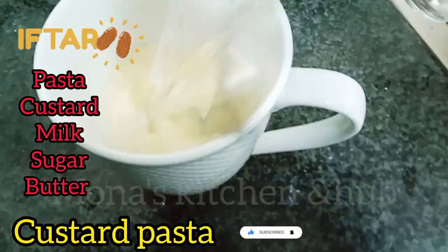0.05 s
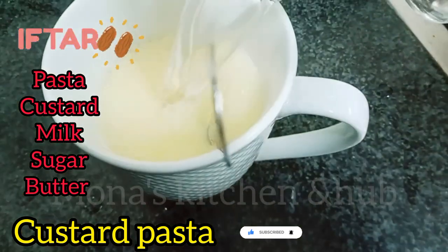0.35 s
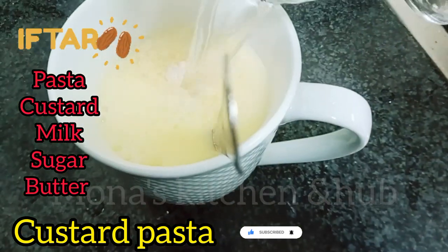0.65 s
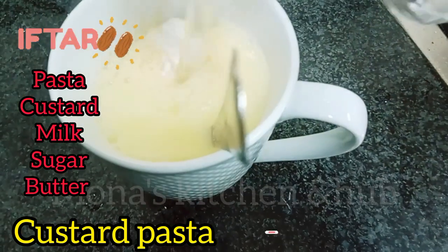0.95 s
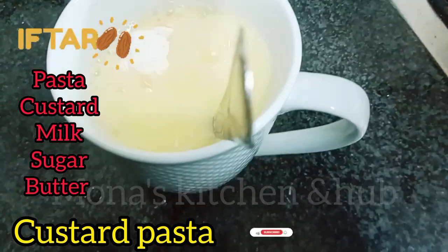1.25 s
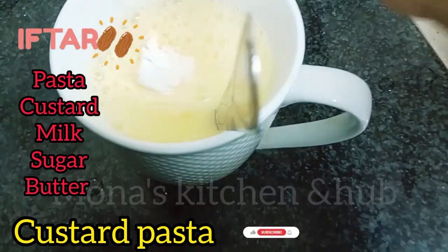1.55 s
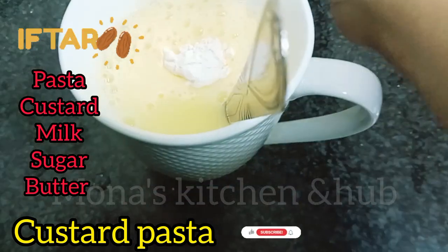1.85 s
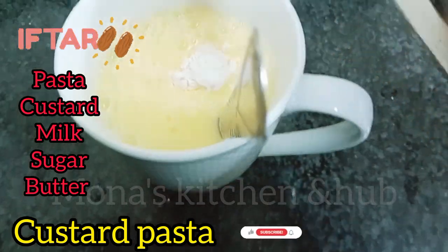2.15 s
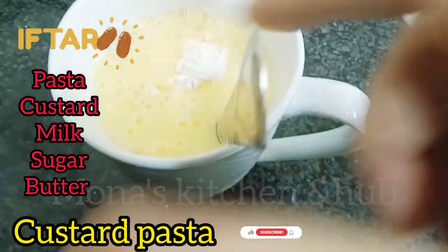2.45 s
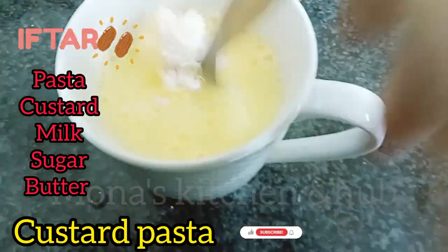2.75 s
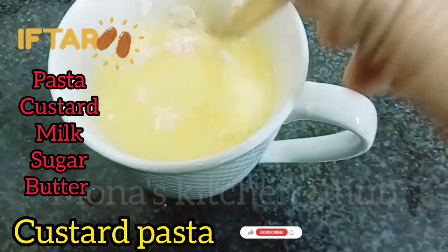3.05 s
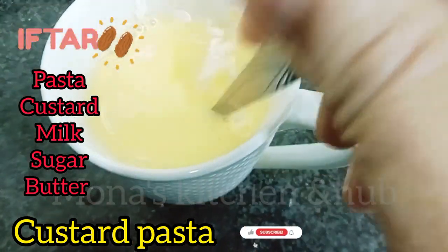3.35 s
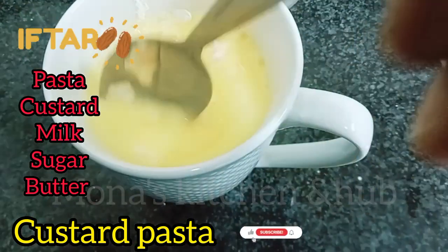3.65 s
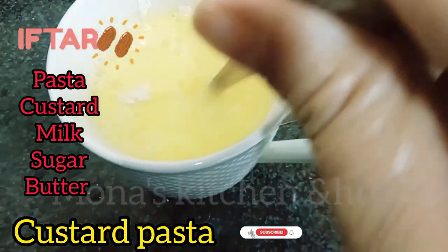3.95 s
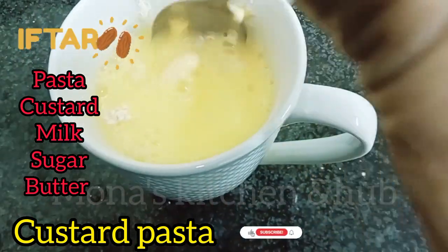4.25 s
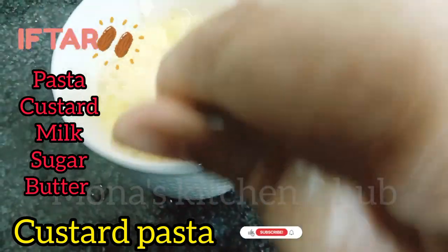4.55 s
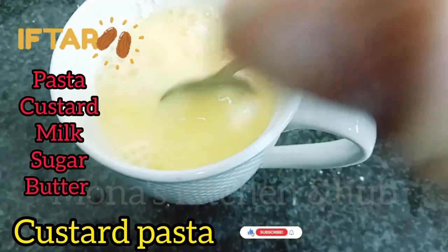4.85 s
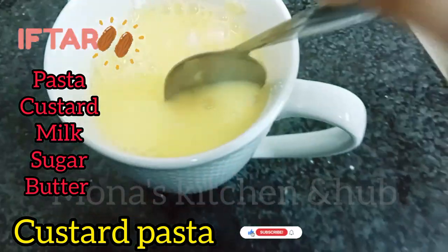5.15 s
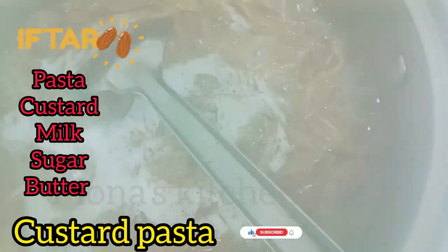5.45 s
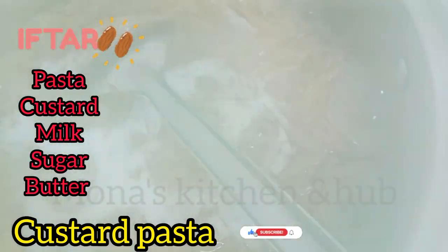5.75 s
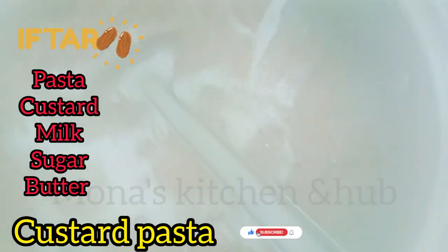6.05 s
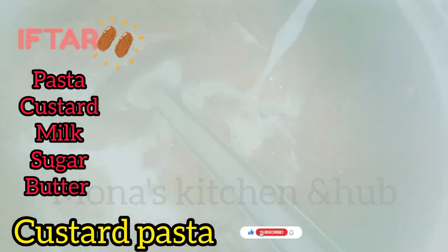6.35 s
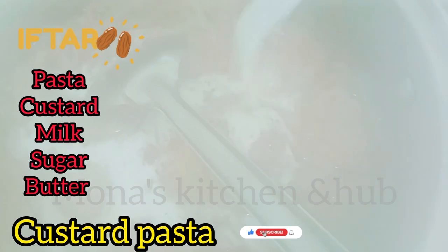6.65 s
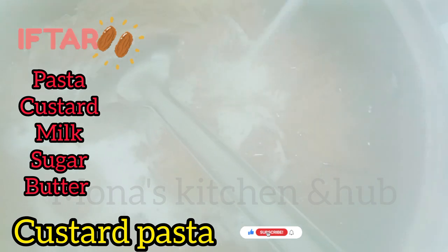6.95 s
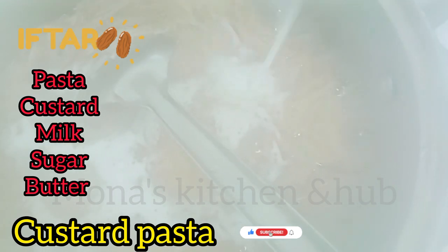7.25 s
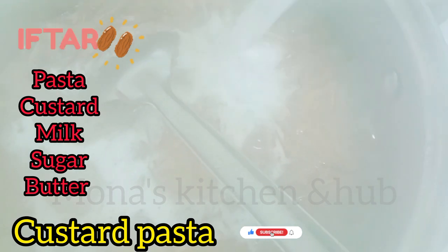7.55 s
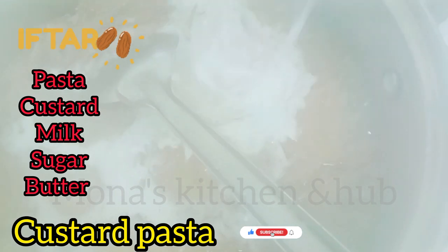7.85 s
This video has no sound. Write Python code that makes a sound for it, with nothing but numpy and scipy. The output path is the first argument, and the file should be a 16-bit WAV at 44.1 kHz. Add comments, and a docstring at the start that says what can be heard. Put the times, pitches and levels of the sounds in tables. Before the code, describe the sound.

Light spoon clinks over a fan hum and one loud glass knock, followed by a brief gap and milk boiling hard up close.

```python
"""A spoon ticks and sloshes in a mug, working custard powder into milk, while a kitchen fan hums and a pot
simmers further off. A glass dish knocks down on the stone counter, rings and rattles to rest.
After a short silence the pot is close: milk and noodles boil hard. Bubbles ring briefly as their films
tear, crowds of them churn and fizz, and the froth spits droplets that sizzle on the hot steel."""
import sys
import numpy as np
from scipy import signal
from scipy.fft import rfft, irfft
from scipy.io import wavfile
from scipy.ndimage import uniform_filter1d

SR = 44100
rng = np.random.default_rng(int(sys.argv[2]) if len(sys.argv) > 2 else 0)


def generate_wav(sig):
    """Save sig (samples, or channels by samples) to the path in sys.argv[1] as 16-bit PCM at SR."""
    pcm = np.round(np.clip(np.atleast_2d(sig).T, -1, 1) * 32767).astype(np.int16)
    wavfile.write(sys.argv[1], SR, pcm)


N = 348390
TIME = np.arange(N) / SR
MUG_SPAN_S, POT_SPAN_S = (0, 5.277), (5.829, 7.9)


def amp(db):
    """Decibels to gain."""
    return 10 ** (np.asarray(db) / 20)


def unit_rms(x):
    """Scales to rms 1."""
    return x / np.sqrt(np.mean(x ** 2) + 1e-20)


def curve_at(points, hz):
    """Reads a curve on a log-frequency axis."""
    freqs, values = np.transpose(points)
    return np.interp(np.log(hz + 1), np.log(freqs + 1), values)


def add(mix, start_s, sound):
    """Mixes a sound in at a time."""
    part = mix[max(round(start_s * SR), 0):][:len(sound)]
    part += sound[:len(part)]


def colour(x, eq, resonances=(), size=8192):
    """Minimum-phase EQ with optional resonances; white noise keeps its power."""
    hz = abs(np.fft.fftfreq(size, 1 / SR))
    bumps_db = sum(db / (1 + (2 * (hz - centre) / width) ** 4) for centre, width, db in resonances)
    log_gain = np.log(amp(curve_at(eq, hz) + bumps_db))
    taps = np.fft.ifft(np.exp(np.conj(signal.hilbert(log_gain)))).real[:size // 2]
    return signal.oaconvolve(x, taps / np.linalg.norm(taps))[:len(x)]


def drift(rate_hz):
    """Slow random motion of rms 1."""
    hz = np.fft.rfftfreq(N, 1 / SR)
    return unit_rms(irfft(rfft(rng.standard_normal(N)) / (1 + (hz / rate_hz) ** 4), N))


def swell(peak_s, width_s, db):
    """A bell-shaped envelope."""
    return amp(db) * np.exp(-((TIME - peak_s) / width_s) ** 2)


def during(span):
    """A gate with quick fades, open inside the span."""
    return uniform_filter1d(1. * ((TIME >= span[0]) & (TIME <= span[1])), size=128)


def chance_times(per_s, span, size=64):
    """Random moments within a span."""
    times = span[0] + np.cumsum(rng.exponential(1, size)) / per_s
    return times[times < span[1]]


def ring(modes, rise_s):
    """One second of decaying modes after a blow whose contact lasts rise_s."""
    t = np.arange(SR) / SR
    sound = sum(amp(db - 60 * t / t60) * np.sin(2 * np.pi * hz * t) for hz, db, t60 in modes)
    return sound * (1 - np.exp(-(t / rise_s) ** 2))


def burst(decay_s):
    """A puff of noise that dies away."""
    return rng.standard_normal(SR // 2) * np.exp(-np.arange(SR // 2) / SR / decay_s)


def patter(decay_s, per_s):
    """Separate tiny clicks that die away."""
    return burst(decay_s) * (rng.random(SR // 2) < per_s / SR)


def clicks(per_s, spread_db):
    """Random clicks, most small and a few large."""
    size_db = spread_db * np.minimum(rng.exponential(1, N), 4)
    return (rng.random(N) < per_s / SR) * amp(size_db) * rng.choice([-1, 1], N)


def bubble(hz, cycles, glide):
    """A film tears: the cavity rings up over `cycles` and dies, rising in pitch as it opens."""
    age = np.arange(0, 10, hz / (cycles * SR))  # 1 at full swing
    return (age * np.exp(1 - age)) ** 2 * np.sin(2 * np.pi * cycles * (age + glide * age ** 2 / 2))


def bubbling(per_s, spread_db, cycles, low_hz, high_hz, count=24):
    """A crowd of bubbles of all sizes, at rms 1."""
    voices = (hz * signal.oaconvolve(clicks(per_s / count, spread_db), bubble(hz, cycles, 0.035))[:N]
              for hz in np.geomspace(low_hz, high_hz, count))
    return unit_rms(sum(voices))


# Reverb time of the kitchen: freq_hz, t60_s
ROOM_DECAY = [(100, 0.83), (500, 0.61), (1500, 0.89), (4000, 0.25), (9000, 0.29), (16000, 0.51)]
def room(x, early_db, tail_db):
    """Adds quick reflections from counter and wall, then the tail of a tiled kitchen."""
    t = np.arange(SR) / SR
    sparse = rng.choice([-1., 1.], SR) * (rng.random(SR) < 2500 / SR)
    early = sparse * (t > .002) * np.exp(-t / 0.0097)
    diffuse = np.roll(sparse, SR // 2) * np.minimum(t / 0.017, 1)
    hz, frame_s, bands = signal.stft(diffuse, SR, nperseg=256)
    decay = amp(-60 * frame_s / curve_at(ROOM_DECAY, hz)[:, None])
    tail = signal.istft(bands * decay, SR, nperseg=256)[1][:SR]
    echo = amp(early_db) * early / np.linalg.norm(early) + amp(tail_db) * tail / np.linalg.norm(tail)
    return x + signal.fftconvolve(x, echo)[:N]


# EQ of the room tone: freq_hz, gain_db
KITCHEN_EQ = [(15, -63.5), (25, -38.5), (44, -13.5), (91, -17.5), (227, -10), (260, -8.5), (322, -11),
              (445, -3.5), (567, -13.5), (762, -4), (997, -17.5), (1570, -21), (3630, -30.5), (8350, -62),
              (15500, -65)]
# Broad resonances of the hob corner: centre_hz, width_hz, gain_db
HOB_RESONANCES = [(64, 20, 8.5), (99, 60, 3.5), (130.2, 33, 10), (203, 51, 5), (327.5, 39, -3.5),
                  (447, 174, -0.5), (747, 150, -4), (1525, 250, 5), (2530, 570, 2.5), (4430, 840, 4.5)]
# Larger bubbles in the far pot: start_s, pitch_hz, level_db
FAR_PLIPS = [(0.11, 1340, -40), (0.115, 1230, -28), (0.98, 1530, -32.5), (1.1022, 833, -29),
             (1.643, 1640, -31.5)]
def kitchen(level_db=-37.5, swell_db=.6):
    """The bed: rush of fan and burner with the far simmer, softened by the room."""
    simmer = bubbling(per_s=900, spread_db=3, cycles=1, low_hz=400, high_hz=6500)
    simmer = unit_rms(room(simmer, early_db=-1.5, tail_db=-9.5))
    rush = unit_rms(colour(rng.standard_normal(N) + amp(-5.5) * simmer, KITCHEN_EQ, HOB_RESONANCES))
    plips = np.zeros(N)
    for start_s, hz, db in FAR_PLIPS:
        add(plips, start_s, amp(db) * bubble(hz, cycles=2.2, glide=.005))
    return rush * amp(level_db + swell_db * drift(7.4)) + room(plips, early_db=2.5, tail_db=-10.5)


# Lesser fan tones: pitch_hz, level_db
FAN_TONES = [(99.8, -49), (538, -56), (786, -52.5)]
# Automation of the main hum: time_s, pitch_hz, level_db
HUM_CURVE = [(0, 261.1, -37.5), (.3, 265.7, -46.5), (.45, 262.5, -46), (.65, 262.8, -38.5),
             (1.25, 262.8, -44.5), (1.6, 260.7, -40), (2.1, 264, -49), (2.9, 260.7, -46.5),
             (3.2, 260.9, -43.5), (4.6, 261.8, -42), (5.25, 265, -42.5)]
def fan(held_db=None, waver=0.2, wander_hz=0.77):
    """Motor and blade tones waver in the moving air; the main hum swells and fades unless held."""
    times, pitches, levels = np.transpose(HUM_CURVE)
    if held_db is None:
        hum = (np.interp(TIME, times, pitches), np.interp(TIME, times, levels))
    else:
        hum = (pitches.mean(), held_db)
    out = np.zeros(N)
    for hz, db in FAN_TONES + [hum]:
        gain = amp(db) * np.sqrt(2) * (1 + waver * drift(12))
        out += gain * np.sin(2 * np.pi * np.cumsum(hz + wander_hz * drift(3.9)) / SR)
    return out


# Strokes through the milk: peak_s, rise_s, level_db
STROKES = [(2.68, .09, -39), (2.99, .06, -43), (3.37, .17, -39), (3.53, .06, -44), (3.86, .1, -44),
           (4.07, .08, -41), (4.6, .15, -45), (4.92, .07, -38), (5.24, .05, -40)]
# Drags of wet powder along the wall: peak_s, half_length_s, level_db
POWDER_DRAGS = [(1.286, .015, -40.5), (2.91, 0.028, -60), (3.513, 0.036, -48), (3.9, .06, -47),
                (4.245, 0.021, -51), (4.698, 0.057, -45.5), (4.785, 0.038, -44.5), (4.91, 0.032, -48),
                (5.138, 0.022, -46.5), (5.275, 0.025, -42)]
# EQ of the powder's swish: freq_hz, gain_db
SWISH_EQ = [(500, -20), (1300, 7.5), (2800, 3), (4400, -7), (7000, -41.5), (15000, -62)]
def slosh(fall_s=0.026):
    """Each stroke folds air into the thick milk, a soft low gurgle; wet powder scrapes the wall."""
    gurgle = bubbling(per_s=350, spread_db=1, cycles=3, low_hz=420, high_hz=530, count=8)
    grains = colour(clicks(per_s=900, spread_db=2), SWISH_EQ)
    swish = unit_rms(room(grains, early_db=-2.5, tail_db=-4))
    speed = sum(swell(peak_s, np.where(TIME < peak_s, rise_s, fall_s), db)
                for peak_s, rise_s, db in STROKES)
    pressure = sum(swell(*drag) for drag in POWDER_DRAGS)
    return speed * gurgle + pressure * swish


# Spoon hits: start_s, level_db, pitch_hz, focus_db_per_octave, brightness_db, ring_time_ratio
SPOON_TICKS = [(0.055, -37, 2500, -8, -24, 0.29), (0.0878, -30.5, 4510, 45, -42, 0.53),
               (0.1738, -37.5, 3450, 8, -50, 0.66), (0.787, -32, 3770, 17.5, -48, 0.31),
               (1.103, -34.5, 2330, 12.5, -55, 0.48), (1.148, -40.5, 5540, 35, -53, .5),
               (1.1767, -37.5, 3370, 10, -57, 0.52), (1.2997, -35, 3564, 80, -44, 2.6),
               (1.3016, -36, 5600, 38, -51, 0.81), (1.3605, -38.5, 3000, 14, -51, 0.74),
               (2.0135, -37.5, 3073, 20, -52, 0.37), (2.129, -34.5, 2880, 7, -38, 0.33),
               (2.2942, -37, 2670, 15, -51, 0.74), (2.9615, -39.5, 4400, 7, -42, .45),
               (3.0183, -42, 5840, 13, -41, .4), (3.0392, -32, 2200, 3.5, -36, 0.36),
               (3.364, -27.5, 2327, 1, -35, 0.35), (3.3773, -26.5, 1520, 16.5, -40, 0.41),
               (3.392, -42, 4240, 12.5, -52, 0.44), (3.444, -33, 4180, 13, -39, 0.52),
               (3.526, -37, 4400, -1, -52, 0.39), (3.652, -42, 5140, 32, -48, 0.68),
               (3.744, -29.5, 5980, 1, -59, 0.53), (4.003, -33.5, 2290, 11.5, -52, 0.52),
               (4.3174, -32, 4460, -3.5, -55.5, 0.32), (4.543, -38.5, 4700, 23, -49, 0.82),
               (5.219, -36, 4190, 16, -51, 0.54)]
# Modes of spoon and wet mug: pitch_hz, level_db, t60_s
MUG_MODES = [(1597, -1.5, 0.097), (2074, -0.5, 0.054), (2520, -5, .05), (3246, 0.5, .04),
             (3620, -13.5, 0.068), (4390, -5.5, 0.032), (5120, -16, 0.04), (5590, -18.5, 0.046),
             (5980, -18.5, 0.051)]
# EQ of steel scraping the mug: freq_hz, gain_db
SCRAPE_EQ = [(600, -26), (1400, -1), (3600, 3.5), (5800, -14), (7500, -31.5), (15000, -45.5)]
def spoon(detune=0.012, scrape_db=-20, grazes_per_s=3.9, graze_db=-44):
    """Steel ticks and grazes on the mug; milk damps and detunes the modes, the contact spot tilts them."""
    out = np.zeros(N)
    shifts = rng.uniform(-detune, detune, len(SPOON_TICKS))
    for (start_s, db, pitch_hz, focus_db, bright_db, ring_ratio), shift in zip(SPOON_TICKS, shifts):
        modes = [(hz * (1 + shift), level - focus_db * abs(np.log2(hz / pitch_hz)), t60 * ring_ratio)
                 for hz, level, t60 in MUG_MODES]
        # the bowl's own ring at the place of contact
        contact_db = min(curve_at(SCRAPE_EQ, pitch_hz), 0) - 0.5
        modes.append((pitch_hz, contact_db, 0.027 * ring_ratio))
        scrape = amp(scrape_db) * colour(burst(.003), SCRAPE_EQ)
        sheen = amp(bright_db) * colour(burst(.006), FIZZ_EQ)
        add(out, start_s, amp(db) * ring(modes, rise_s=0.00027))
        add(out, start_s, amp(db) * (scrape + sheen))
    graze = colour(burst(0.0086), SCRAPE_EQ)
    for start_s in chance_times(grazes_per_s, MUG_SPAN_S):
        add(out, start_s, amp(graze_db) * graze)
    return room(out, early_db=-4.5, tail_db=-9.5)


# The dish hits the counter: start_s, level_db, base_tone_db, glass_boost_db, rolloff_db_per_octave
DISH_KNOCKS = [(1.7602, 0, 0, 3, 0), (1.8094, -6, -9, -6, 0), (1.8334, -6, -6, -5, 0),
               (1.8460, -12, -8, 18, 15)]
# Clear tone of the dish's base: pitch_hz, level_db, t60_s
BASE_MODES = [(577, -8.5, .2)]
# Dull body of dish and counter: pitch_hz, level_db, t60_s
BODY_MODES = [(95.8, -34, .4), (118, -34.5, 0.54), (677, -31.5, .22), (688, -34, .25), (744, -28, .22),
              (893, -25, 0.31), (1000, -33.5, 0.14), (1050, -27.5, .18), (1252, -28.5, 0.11),
              (1410.5, -35, .09), (1650, -32.5, .3), (1681, -33, .26), (2204, -29, .15), (2686, -29.5, .2),
              (2922, -39.5, 0.16)]
# Hard crack of each contact: pitch_hz, level_db, t60_s
CRACK_MODES = [(1360, -13, 0.0091), (2282, -10.5, 0.017), (2680, -14.5, 0.013)]
# Thin ring of the glass wall: pitch_hz, level_db, t60_s
GLASS_MODES = [(4006, -48.5, 0.1), (5060, -43.5, 0.59), (5500, -61.5, .11), (8570, -62, .1),
               (8560, -59.5, .33), (9420, -71, .08), (9900, -68.5, .12), (11750, -57, .06),
               (13150, -69, .08), (15070, -62, .07)]
# EQ of the thud: freq_hz, gain_db
THUD_EQ = [(40, -29.5), (110, -10), (230, -3.5), (350, -16.5), (490, -21), (650, -3.5), (1200, -10.5),
           (2700, -20.5), (3300, -27), (5500, -37.5), (7200, -66.5), (8700, -45.5), (10500, -69),
           (15000, -68)]
# EQ of the closing chatter: freq_hz, gain_db
CHATTER_EQ = [(60, -31.5), (300, -22.5), (600, -2.5), (850, 6), (1200, -2), (2700, -5), (3300, -29),
              (5500, -40.5), (15000, -72.5)]
def dish(slab_hz=720, slab_s=.0046, split_hz=11.5):
    """The base lands, rocks and settles; each contact flexes the counter, clatters and rings the glass."""
    t = np.arange(0, slab_s, 1 / SR)
    clack = -np.sin(np.pi * t / slab_s) ** 2 * np.sin(2 * np.pi * slab_hz * t)
    # the wall is not quite round, so each mode is a close pair that beats
    beat = np.cos(np.pi * split_hz * np.arange(SR) / SR)
    rocking = 1 + 0.27 * drift(rate_hz=45)[:SR]  # grips and frees the base tone
    body, direct = np.zeros(N), np.zeros(N)
    for start_s, db, base_db, glass_db, rolloff_db in DISH_KNOCKS:
        ring_s = start_s + .001
        add(direct, ring_s, amp(base_db) * ring(BASE_MODES, rise_s=.0016) * rocking)
        add(body, ring_s, amp(db - 1) * ring(BODY_MODES, rise_s=.0016))
        add(body, start_s, amp(db - 18.5) * colour(burst(0.014), THUD_EQ))
        add(direct, start_s, amp(db - 1.5) * clack)
        add(direct, ring_s, amp(db) * ring(CRACK_MODES, rise_s=.0012))
        glass = [(hz, level - rolloff_db * max(np.log2(hz / 5000), 0), t60)
                 for hz, level, t60 in GLASS_MODES]
        add(direct, start_s, amp(db + glass_db) * ring(glass, rise_s=.002) * beat)
    chatter = colour(patter(decay_s=0.061, per_s=650), CHATTER_EQ)
    add(body, DISH_KNOCKS[-1][0], amp(-11.5) * chatter)
    return room(body, early_db=-11, tail_db=-4) + room(direct, early_db=-20, tail_db=-13)


# EQ of churning milk: freq_hz, gain_db
CHURN_EQ = [(15, -59), (25, -24), (43, -7.5), (70, -13.5), (88, -4), (198, 2.5), (266, -1), (286, -7),
            (394, -0.5), (480, -5.5), (530, -6), (786, -7.5), (1010, -11), (2900, -17), (3500, -25.5),
            (4450, -27.5), (5000, -33), (6200, -56), (9000, -51.5), (11700, -79), (19800, -120)]
# Resonances of the pot: centre_hz, width_hz, gain_db
POT_RESONANCES = [(65.6, 15, 11.5), (111, 5.9, 3.5), (205.5, 9.4, 5.5), (367, 46, -2.5), (746, 300, 2.5),
                  (1360, 150, 0.5)]
# EQ of crackling froth: freq_hz, gain_db
FROTH_EQ = [(2500, -14.5), (3900, 6), (4600, -8), (5500, -3), (6200, -8.5), (6400, -9.5), (6900, -9),
            (7800, -24), (10000, -38), (15500, -34)]
# EQ of fine fizz, also the sheen on the spoon hits: freq_hz, gain_db
FIZZ_EQ = [(5000, -16.5), (7200, -1), (8500, -2.5), (10300, -4), (11300, 1), (12300, 0), (14200, 2),
           (15500, 1)]
def boil(froth_start_s=5.98, froth_rise_s=.06, fizz_settle_s=0.42):
    """Milk churns, small bubbles crackle in clumps, and the fizz surges as the froth rises."""
    age_s = np.maximum(TIME - froth_start_s, 0)
    froth = np.minimum(.33 + age_s / froth_rise_s, 1)
    crowd = bubbling(per_s=1000, spread_db=2.8, cycles=1.3, low_hz=300, high_hz=6000)
    crowd = unit_rms(room(crowd, early_db=0, tail_db=-10.5))
    churn = unit_rms(colour(crowd + rng.standard_normal(N), CHURN_EQ, POT_RESONANCES))
    crackle = bubbling(per_s=300, spread_db=3.4, cycles=2.6, low_hz=2800, high_hz=7600)
    crackle = unit_rms(room(colour(crackle, FROTH_EQ), early_db=-4, tail_db=-9))
    fizz = bubbling(per_s=900, spread_db=3.8, cycles=2.5, low_hz=6000, high_hz=15500)
    fizz = unit_rms(room(colour(fizz, FIZZ_EQ), early_db=-2, tail_db=-7))
    clumps = drift(rate_hz=9.5)
    surge_db = 5 * np.exp(-(age_s / fizz_settle_s) ** 2)
    return (churn * amp(-33 - 2 * age_s)  # the churn eases off as the crackle builds
            + crackle * amp(-65 + 5.5 * age_s + 1.3 * clumps)
            + froth * fizz * amp(-80.5 + surge_db + 1.2 * clumps))


# Stray droplets on the hot steel: peak_s, level_db
SPATTERS = [(6.533, -66), (6.602, -68), (6.666, -73), (6.762, -68), (6.792, -64), (6.821, -63),
            (6.833, -68), (6.862, -62), (7.04, -62), (7.058, -60), (7.12, -69), (7.223, -57), (7.235, -62),
            (7.484, -61), (7.76, -64), (7.791, -64)]
def spatters(width_s=0.0039):
    """Tiny droplets land on the hot wall and sizzle away at once."""
    landing = sum(swell(peak_s, width_s, db) for peak_s, db in SPATTERS)
    sizzle = unit_rms(colour(clicks(per_s=4000, spread_db=1), FIZZ_EQ))
    return room(landing * sizzle, early_db=-15, tail_db=-14)


# Collapsing patches of froth: peak_s, level_db
FLURRIES = [(5.956, -38), (6.15, -40), (6.26, -37), (6.411, -32.5), (6.528, -35), (6.975, -32),
            (7.175, -40), (7.416, -40.5), (7.455, -32.5), (7.634, -38), (7.868, -42)]
# EQ of a collapse: freq_hz, gain_db
FLURRY_EQ = [(300, -14), (900, -2.5), (2600, -1), (4000, -15), (6000, -34), (9000, -62)]
def flurries(width_s=0.015):
    """A patch of froth gives way and many small bubbles burst together."""
    collapse = sum(swell(peak_s, width_s, db) for peak_s, db in FLURRIES)
    crowd = bubbling(per_s=1200, spread_db=2, cycles=1.4, low_hz=600, high_hz=6000)
    return room(collapse * unit_rms(colour(crowd, FLURRY_EQ)), early_db=-9.5, tail_db=-19.5)


# Spits of froth: start_s, level_db, spray_offset_db
SPITS = [(5.8945, -58, -35), (6.317, -40.5, -30), (6.412, -40.5, -13), (6.666, -44, -25), (6.77, -37, -30),
         (6.814, -38, -18), (6.969, -32, -35), (6.99, -31, -6), (7.2167, -26, -24), (7.4462, -18, -19),
         (7.584, -45, -6), (7.661, -21.5, -27), (7.716, -37, -9), (7.8572, -30, -40), (7.876, -30, -12)]
def spits(droplet_db=-28, droplet_decay_s=0.038):
    """The froth snaps open, tears on for a moment and throws a spray of droplets that tinkle back."""
    out, falling = np.zeros(N), np.zeros(N)
    fall = np.exp(-np.arange(SR) / SR / droplet_decay_s)
    for start_s, db, spray_db in SPITS:
        snap = burst(0.0018)
        tear = amp(-0.5) * patter(decay_s=0.0088, per_s=1300)
        add(out, start_s, amp(db) * colour(snap + tear, FROTH_EQ, resonances=[(3600, 400, 2.6)]))
        add(out, start_s + .0008, amp(db + spray_db) * colour(burst(0.0011), FIZZ_EQ))
        add(falling, start_s, amp(db + spray_db + droplet_db) * fall)
    droplets = bubbling(per_s=2600, spread_db=3, cycles=3, low_hz=5500, high_hz=15500)
    return room(out + falling * unit_rms(colour(droplets, FIZZ_EQ)), early_db=-25, tail_db=-9.5)


def random_pops(per_s=14, thinning_s=1, pitch_hz=1420, level_db=-25.5, cycles=1.19, size=64):
    """Cues for further pops at random, ever fewer as the froth covers the milk."""
    octaves, draws = 0.95 * rng.uniform(-0.85, 1, size), rng.random(size)
    return [(start_s, pitch_hz * 2 ** octave, level_db, cycles)
            for start_s, octave, draw in zip(chance_times(per_s, POT_SPAN_S), octaves, draws)
            if draw < np.exp((POT_SPAN_S[0] - start_s) / thinning_s)]


# Distinct foreground bubble pops, large and small: start_s, pitch_hz, level_db, attack_cycles
POPS = [(5.868, 2027, -18.5, 1.2), (5.8937, 2600, -24, 0.74), (5.9517, 1780, -20, 1.1),
        (5.9597, 1910, -20, 1.4), (5.9899, 1270, -20.5, 1.6), (6.002, 2600, -23, 1.4),
        (6.0078, 4320, -34, 2.9), (6.139, 1410, -16.5, 0.55), (6.173, 1320, -21.5, 1.6),
        (6.2005, 880, -16.5, 0.57), (6.215, 2466, -27, 1.3), (6.2553, 905, -15.5, 0.5),
        (6.2697, 2950, -17, 2.5), (6.297, 1254, -21.5, 0.73), (6.328, 2450, -22.5, 0.87),
        (6.406, 2600, -17.5, 0.73), (6.4545, 1790, -26, 2.5), (6.519, 2400, -29, 0.83),
        (6.5248, 3040, -32, 5.2), (6.5307, 2960, -24, 1.75), (6.556, 1430, -23.5, 2.2),
        (6.601, 3160, -19.5, 1), (6.6648, 3000, -27.5, 2.7), (6.69, 2500, -23, 1.46),
        (6.763, 1350, -22, 0.94), (6.771, 4020, -23.5, 1.4), (6.9744, 2670, -35, .6),
        (7.0118, 3300, -31, 2.8), (7.1184, 2620, -21.5, 1.8), (7.1256, 3150, -26, 1.9),
        (7.1574, 1350, -17, 0.81), (7.1715, 2120, -26, 3.5), (7.1907, 3480, -33, 2.4),
        (7.2161, 3830, -36, 3), (7.2592, 4250, -38, 3), (7.4116, 1307, -16, 0.52), (7.416, 2420, -25, 1.2),
        (7.4465, 4060, -19, 1.9), (7.446, 620, -14, 0.78), (7.5054, 1290, -19.5, 0.82),
        (7.6252, 1480, -21.5, 1.2), (7.652, 2060, -14, 1.1), (7.6524, 3620, -24, 4.5), (7.66, 4770, -33, 3),
        (7.7509, 1690, -18.5, 0.4), (7.844, 4430, -28, 2.1), (7.8569, 2900, -11.5, 1.6),
        (7.8656, 4700, -27, 1.4), (7.8655, 514, -26.5, 2)]
def pops(neighbour_count=3, neighbour_db=-17, follow_s=0.028):
    """Bubbles burst in the foreground and each takes a few neighbours with it."""
    out = np.zeros(N)
    cues = POPS + random_pops()
    for (start_s, hz, db, cycles), neighbours in zip(cues, rng.random((128, neighbour_count, 2))):
        add(out, start_s, amp(db) * bubble(hz, cycles, glide=0.0017))
        for lag, octave in neighbours:
            neighbour = bubble(hz * 2 ** (octave - .6), cycles=1.6, glide=.01)
            add(out, start_s + .003 + follow_s * lag, amp(db + neighbour_db - 6 * lag) * neighbour)
    return room(out, early_db=-12, tail_db=-13)


def scene():
    """First beside the mug, then, after a silence, over the pot."""
    at_mug = kitchen() + fan() + spoon() + slosh() + dish()
    at_pot = boil() + pops() + flurries() + spits() + spatters() + amp(-1) * fan(held_db=-45)
    return (at_mug * during(MUG_SPAN_S) + at_pot * during(POT_SPAN_S))[None]


def record(dry, low_cut_hz=45, high_cut_hz=15750):
    """The small microphone loses the deep bass; full-scale clipping, then the band limit."""
    thin = signal.sosfilt(signal.butter(2, low_cut_hz, "highpass", fs=SR, output="sos"), dry)
    lowpass = signal.firwin(511, high_cut_hz, window=("kaiser", 9), fs=SR)
    return signal.oaconvolve(np.clip(thin, -1, 1), lowpass[None], "same")


dry = scene()
out = record(dry)
generate_wav(out)
```